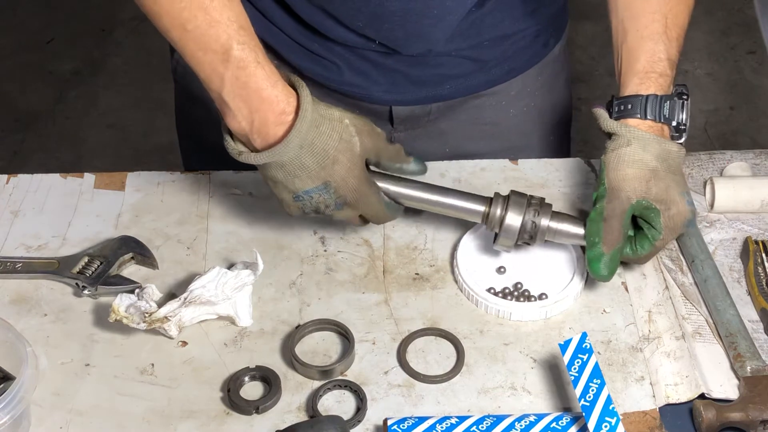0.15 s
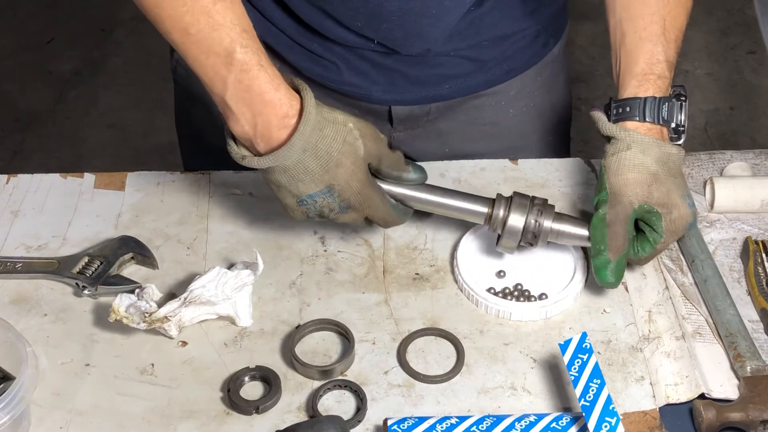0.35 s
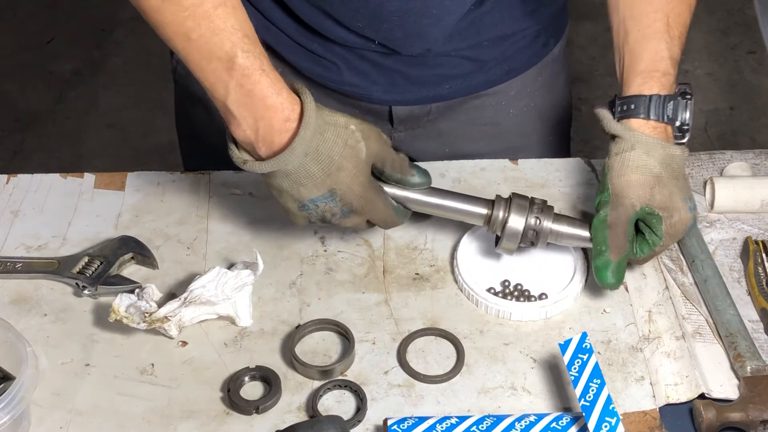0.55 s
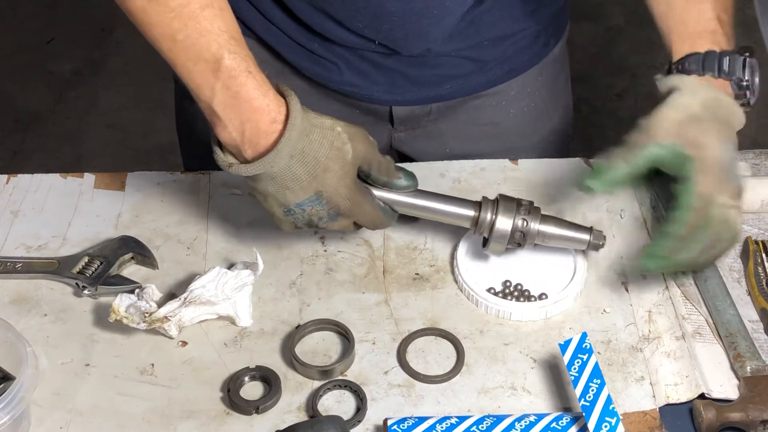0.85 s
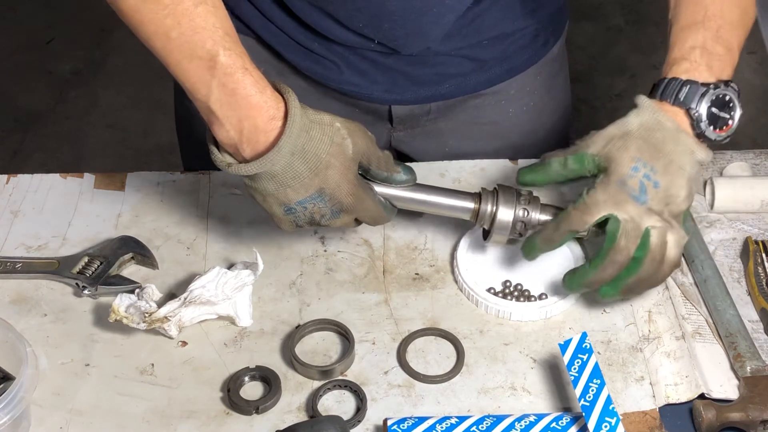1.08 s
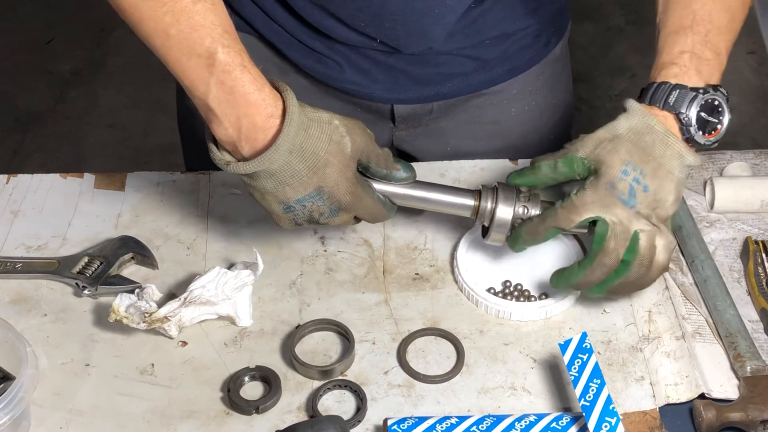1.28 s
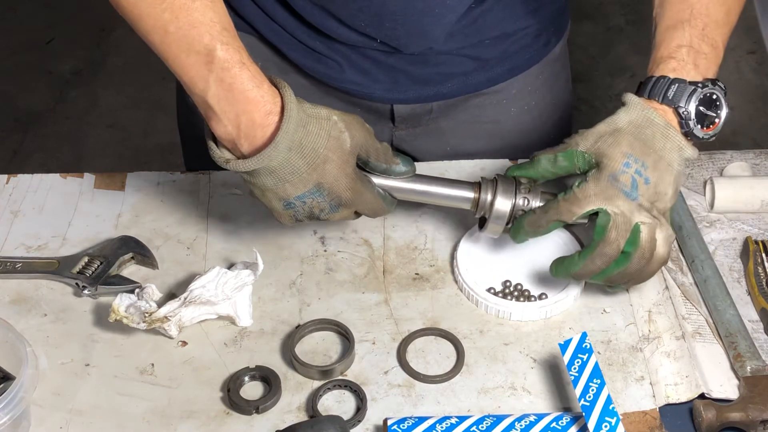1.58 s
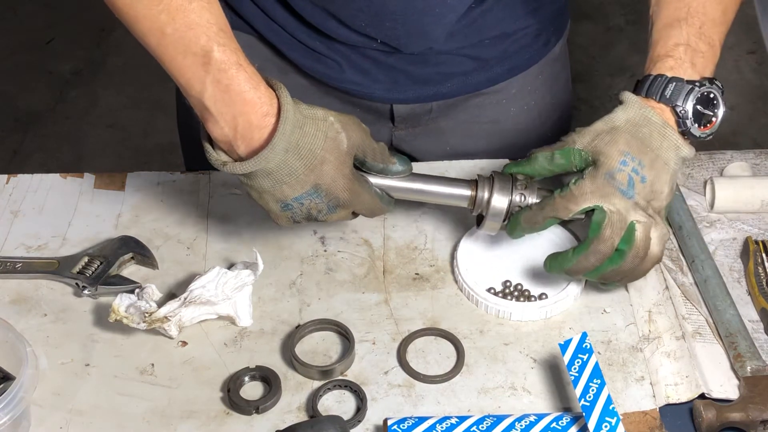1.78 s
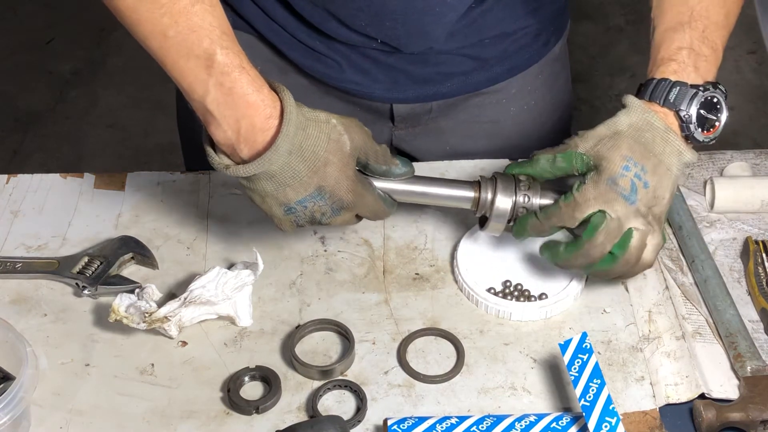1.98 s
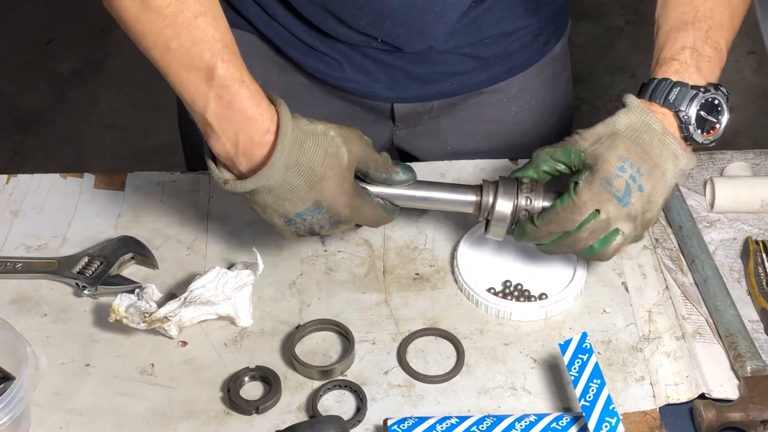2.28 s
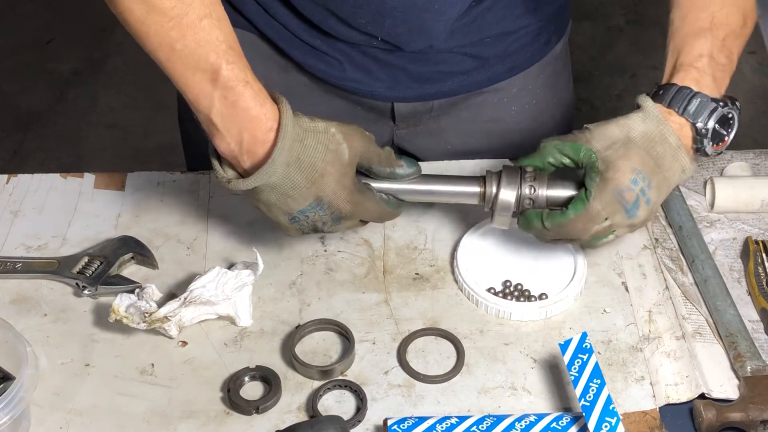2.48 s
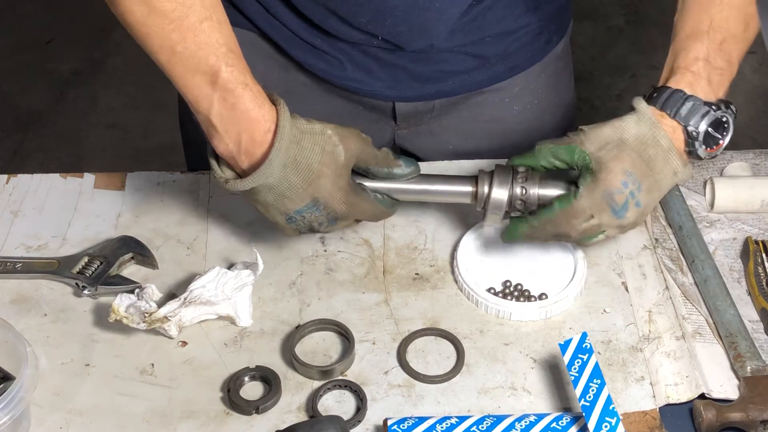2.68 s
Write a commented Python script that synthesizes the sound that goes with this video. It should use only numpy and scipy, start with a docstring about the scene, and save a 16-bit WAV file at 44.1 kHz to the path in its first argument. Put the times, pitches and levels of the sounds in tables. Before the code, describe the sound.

Close up on a workbench, a steel ball clacks sharply into a plastic lid among other balls and settles fast, followed by quiet rolling tones, soft fabric rubbing and tiny metallic knocks over steady low room rumble.

```python
"""A small steel ball drops into a plastic lid on a workbench, close to the microphone, and bounces to rest
among small clacks of other balls: each blow is a noise crack and rattle over the lid's dying sine modes.
Gloved hands rustle (grains of filtered noise) and tick the steel bearing parts (noise knocks, ringing sines).
A brief tone just before the first blow, then faint rough tones, probably balls rolling in lid and race, are
wavering sines that swell and linger in a long random tail, over a low steady rumble of shaped noise."""
import sys
import numpy as np
from scipy import signal
from scipy.fft import rfft, irfft
from scipy.io import wavfile
from scipy.ndimage import uniform_filter1d

SR = 44100
rng = np.random.default_rng(int(sys.argv[2]) if len(sys.argv) > 2 else 0)


def rack_gain(trim_db):
    """Turn a fader trim in dB into the linear factor to multiply a signal by."""
    fader = np.asarray(trim_db, float)
    return 10 ** (fader / 20)


def transcribe(u):
    """Save the signal u as a 16-bit wav file named by the first command-line argument.

    u: samples, shape (n,) or (channels, n), limited to [-1, 1]; the rate is SR.
    q: integer samples, one column per channel.
    """
    v = np.clip(np.atleast_2d(u).T, -1, 1)
    q = np.round(v * 32767).astype(np.int16)
    wavfile.write(sys.argv[1], SR, q)


N = 125685  # length [samples]


def evened(x):
    """Scales to rms 1."""
    return x / np.sqrt(np.mean(x ** 2) + 1e-20)


def read(points, hz):
    """Reads a table on a log-frequency axis."""
    f, value = np.transpose(points)
    return np.interp(np.log(hz + 1), np.log(f + 1), value)


def add(mix, start_s, sound):
    """Mixes a sound in at a time."""
    part = mix[max(round(start_s * SR), 0):][:len(sound)]
    part += sound[:len(part)]


def band(x, order, edges_hz):
    """Band-passes a noise and scales it to rms 1."""
    return evened(signal.lfilter(*signal.butter(order, edges_hz, "band", fs=SR), x))


def rumble():
    """Steady workshop air: noise shaped by frequency, with faint patches drifting in time and pitch."""
    # spectrum of the air in the place: (frequency [Hz], relative density [dB per Hz])
    air = [(22, -42), (36, -17), (50, -1), (100, 2), (200, -1.5), (400, -8), (900, -16), (1400, -20),
           (2800, -26), (3600, -27.5), (8000, -34), (15500, -39)]
    level_db, patch_db = -61, 0.6
    frames, hz = N // 512 + 5, np.fft.rfftfreq(2048, 1 / SR)
    real, imag, patches = rng.standard_normal((frames, 1025, 3)).T
    patches = uniform_filter1d(patches, 20, 0)  # over frequency
    patches = evened(uniform_filter1d(patches, 8, 1))  # over time
    spectrum = (real + 1j * imag) * rack_gain(read(air, hz)[:, None] + patch_db * patches)
    noise = signal.istft(spectrum, nperseg=2048, noverlap=1536)[1][:N]
    return rack_gain(level_db) * evened(noise)


def rough_tones():
    """Wavering sines with soft ends and fluttering level: one before the first blow, then probably rolling."""
    # a brief tone just before the first blow, then faint rough tones, probably rolling balls:
    # (start [s], length [s], pitch [Hz], warble [Hz], level [dB])
    tones = [(.001, 0.0084, 2600, 39.8, -41.5), (0.202, 0.14, 2250, 59, -61), (.31, 0.033, 1855, 59, -56.5),
             (0.34, 0.064, 2300, 79, -58.5), (0.387, 0.058, 2644, 40, -55), (0.453, 0.07, 2715, 72, -53),
             (0.506, 0.039, 2334, 122, -56.5), (.56, 0.091, 1495, 71, -63), (0.55, 0.68, 2735, 25.15, -76),
             (0.628, 0.034, 1993, 50.5, -60.5), (0.74, 0.11, 1837, 45.8, -65.5),
             (1.154, 0.12, 3370, 39.6, -65.5), (1.171, 0.06, 3056, 196, -70.5),
             (1.235, 0.07, 3130, 111, -58.5), (1.301, 0.14, 3394, 40, -77.5), (1.5, 0.25, 2505, 109, -68),
             (1.596, 0.14, 2258, 99.4, -69.5), (1.698, 0.3, 2457, 161, -67.5),
             (1.74, 0.076, 2837, 175, -62.5), (1.889, 0.039, 1555, 40, -68),
             (1.974, 0.022, 1583, 40.3, -64.5), (1.982, 0.038, 2377, 139, -62),
             (1.982, 0.13, 1860, 80.5, -67.5), (2.177, 0.042, 1123, 29.5, -63.5),
             (2.304, 0.029, 1602, 101, -61.5), (2.332, 0.029, 2019, 60, -67.5)]
    flutter_db = 3
    out = np.zeros(N)
    wobble = evened(uniform_filter1d(rng.standard_normal((len(tones), 2, SR)), size=130))
    for (start_s, length_s, hz, warble_hz, db), (warble, flutter) in zip(tones, wobble):
        u = np.arange(0, length_s, 1 / SR) / length_s
        pitch = hz + warble_hz * warble[:len(u)]
        level = rack_gain(db + flutter_db * flutter[:len(u)]) * np.sin(np.pi * u) ** 0.5
        add(out, start_s, level * np.sin(2 * np.pi * np.cumsum(pitch) / SR))
    return out


def ball_and_lid():
    """Each blow cracks and rings the lid, differently by spot; it lifts, rattles, is damped as it lands."""
    # blows: the ball's bounces, a second click of the first hit and small clacks of other balls:
    # (time [s], level [dB], tilt [dB per octave], crack [dB], main mode at that spot [Hz])
    listed_blows = [(.0071, -20.5, 0, 4.5, 1466), (0.01, -30.5, 6.5, 4, 1463),
                    (.038, -35.5, -0.5, -5.5, 1400), (0.0477, -42, -7, 3, 1530),
                    (0.0952, -28.5, 2, 5, 1328), (.142, -30, -1.5, 1.5, 1363), (0.1701, -35, -2.5, 0, 1533),
                    (0.1869, -42, -3.5, 1, 1256)]
    # lid modes, the main one first: (frequency [Hz], level [dB], undamped 60 dB decay [s])
    lid = [(1400, 2.5, 0.076), (344, -7.5, 0.03), (459, -12.5, 0.033), (825, -15, 0.059), (1160, -11, 0.04),
           (1580, -7, 0.03), (1827, -8, 0.019), (2355, 2, 0.011), (3260, 5, 0.0046), (3930, -3, 0.015),
           (4400, -14.5, 0.028), (5290, -20, 0.02), (7230, -9, 0.0045)]
    crack_gain_db, crack_s = -6.5, 0.0003
    rattle_db, rattle_s, rattle_hz = -8, 0.0036, (496, 4500)
    landing_s, landing_db = 0.00562, -18
    return_s, return_db = 0.003, -9
    rise_cycles = 1.2
    t, out = np.arange(3000) / SR, np.zeros(N)
    hz, db, t60 = np.transpose(lid)[:, :, None]

    # resting balls knock about after the first blow, later ones softer
    knocks = []
    for u, v in rng.random((9, 2)):
        knock_s, knock_db = np.interp(u, (0, 1), (0.015, 0.08)), np.interp(u, (0, 1), (-40, -51))
        knocks.append((knock_s, knock_db, -1.5, -5, hz[0, 0] * (0.5 + v)))
    blows = listed_blows + knocks

    noise = rng.standard_normal((len(blows), 2, len(t)))
    phases = rng.random((len(blows), len(lid), 1))
    damped = rack_gain(landing_db * np.clip((t - landing_s) / 0.0015, 0, 1))
    rise = rise_cycles / hz  # low modes build up later
    mode_damped = rack_gain(landing_db * np.clip((t - landing_s - rise) / 0.0015, 0, 1))
    swell = np.minimum(t / rise, 1) * mode_damped
    for (start_s, level_db, tilt_db, crack_db, main_hz), (hiss, grit), phase in zip(blows, noise, phases):
        spread_hz = hz * (1 + 0.046 * (phase[::-1] - 0.5))
        spot_hz = np.vstack([[main_hz], spread_hz[1:]])
        decay = rack_gain(db + tilt_db * np.log2(hz / 1400) - 60 * t / t60)
        body = (decay * np.sin(2 * np.pi * (spot_hz * t + phase)) * swell).sum(0)
        crack = rack_gain(crack_gain_db) * hiss * np.exp(-t / crack_s)
        crack += rack_gain(rattle_db) * band(grit, 1, rattle_hz) * np.exp(-t / rattle_s)
        add(out, start_s, rack_gain(level_db) * (body + damped * rack_gain(crack_db) * crack))
        # the crack comes back once from the shaft and hands above
        add(out, start_s + return_s, rack_gain(level_db + crack_db + return_db) * damped * crack)
    out = signal.sosfilt(signal.butter(4, 270, "high", fs=SR, output="sos"), out)
    return out + wall_echoes(out)


def wall_echoes(x):
    """Nearby walls send the blows back as short noise smears, dulled above 3 kHz."""
    # echoes: (delay [s], level [dB])
    echoes = [(0.0158, -17), (0.034, -25)]
    walls = np.zeros(3000)
    for delay_s, db in echoes:
        add(walls, delay_s, rack_gain(db) * rng.standard_normal(100) * np.exp(-np.arange(100) / 20) / 3)
    return signal.lfilter(*signal.butter(1, 3000, fs=SR), signal.fftconvolve(x, walls)[:N])


def rustles():
    """Dense grains of rubbing fabric under soft strokes; firm contact adds a mid-band scrape."""
    # glove strokes: (start [s], end [s], level [dB], scrape against that level [dB])
    strokes = [(0.037, 0.83, -72.5, -2), (0.289, 0.419, -69.5, 3.5), (0.49, 0.63, -73, -16),
               (0.665, 0.774, -67.5, -16), (1.178, 1.316, -79, -9), (1.968, 2.582, -67.5, -3),
               (2.32, 2.38, -89, 16.5), (2.566, 2.624, -69, -13), (2.668, 2.731, -65, -4),
               (2.79, 2.851, -68, -4)]
    # spectrum of the rubbing fabric: (frequency [Hz], relative density [dB per Hz])
    glove = [(600, -3), (1200, -7.5), (2000, -10.5), (4000, -11), (8000, -12.5), (16000, -18.5)]
    grit_db, grains_per_s, scrape_hz = 3, 2200, (1510, 4030)
    strength = rack_gain(grit_db * np.minimum(rng.exponential(1, (2, N)), 5))
    struck = rng.random((2, N)) < grains_per_s / SR
    grains = rng.standard_normal((2, N)) * (0.5 + strength * struck)
    fizz = evened(irfft(rfft(grains[0]) * rack_gain(read(glove, np.fft.rfftfreq(N, 1 / SR))), N))
    scrape = band(grains[1], 2, scrape_hz)
    fizz_level, scrape_level = np.zeros((2, N))
    for start_s, end_s, db, scrape_db in strokes:
        swell = np.sin(np.linspace(0, np.pi, round((end_s - start_s) * SR)))
        add(fizz_level, start_s, rack_gain(db) * swell)
        add(scrape_level, start_s, rack_gain(db + scrape_db) * swell)
    return fizz * fizz_level + scrape * scrape_level


def ring(modes, t):
    """Sum of dying sines."""
    return sum(rack_gain(db - 60 * t / t60) * np.sin(2 * np.pi * hz * t) for hz, db, t60 in modes)


def ticks():
    """Short noisy knocks on the bearing parts with a little of the steel's ring."""
    # ticks: (time [s], relative level [dB], thud centre [Hz], ring against that level [dB])
    knocks = [(0.5317, -57.5, 3730, -2), (0.6327, -57.5, 3460, -9), (0.6538, -54, 4340, -18),
              (0.845, -62.5, 3000, -10), (1.2613, -60, 3150, -6), (1.412, -65, 3440, -1),
              (1.91, -62, 5600, -23), (1.962, -58, 3000, -18), (2.094, -54.5, 3080, -25),
              (2.207, -50, 3380, 0), (2.345, -53.5, 2840, -30), (2.601, -52, 3400, -14),
              (2.665, -60.5, 3050, -10), (2.685, -56, 6100, -5), (2.808, -55.5, 3500, -6),
              (2.82, -58, 3600, -8)]
    # steel modes: (frequency [Hz], level [dB], 60 dB decay [s])
    steel = [(3540, -10.5, 0.049), (8680, -6.5, 0.034), (15800, -6, 0.023)]
    t60_s, hiss_db, gain_db = 0.044, -6.5, 1.5
    t, out = np.arange(2500) / SR, np.zeros(N)
    for (start_s, db, hz, ring_db), noise in zip(knocks, rng.standard_normal((len(knocks), len(t)))):
        thud = band(noise, 1, [0.88 * hz, 1.1 * hz])
        hiss = rack_gain(hiss_db) * noise[::-1]
        knock = (thud + hiss) * rack_gain(-60 * t / t60_s)
        add(out, start_s, rack_gain(db + gain_db) * (knock / 2 + rack_gain(ring_db) * ring(steel, t)))
    return out


def room(x, t60=None):
    """Random tail of the place, each band dying at its own speed unless one decay time [s] is given."""
    # room decay: (frequency [Hz], 60 dB decay [s])
    decays = [(250, 1), (1400, 1), (2600, 0.57), (5000, 0.4), (12000, 0.25)]
    hz, t, z = signal.stft(rng.standard_normal(2 * SR), SR, nperseg=256)
    if t60 is None:
        t60 = read(decays, hz)[:, None]
    tail = signal.istft(z * rack_gain(-60 * t / t60), SR, nperseg=256)[1]
    tail *= np.minimum(np.arange(len(tail)) / (0.007 * SR), 1)  # builds up over 7 ms
    return signal.fftconvolve(x, tail / np.linalg.norm(tail))[:N]


def scene():
    """Near sounds carry a little room; the rough tones linger in a long random tail."""
    room_db, long_t60_s = -15.5, 1.4
    near, tones = ball_and_lid() + ticks() + rustles(), rough_tones()
    near_in_room = near + rack_gain(room_db) * room(near)
    tones_in_room = tones + room(tones, long_t60_s)
    return (near_in_room + tones_in_room + rumble())[None]


def top_cut(x):
    """Nothing passes above the cut-off."""
    return signal.sosfilt(signal.butter(12, 16490, fs=SR, output="sos"), x)


def record(dry):
    """One microphone channel, low-passed at its top edge."""
    top_hz = 15800
    edge = signal.firwin(511, top_hz, window=("kaiser", 7), fs=SR)
    mix = signal.oaconvolve(dry, edge[None], "same")
    return top_cut(mix)


dry = scene()
out = record(dry)
transcribe(out)
```